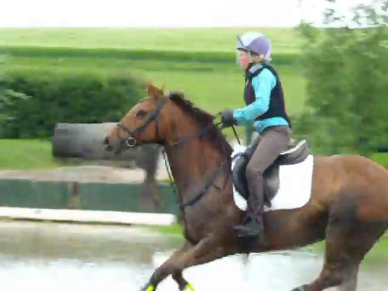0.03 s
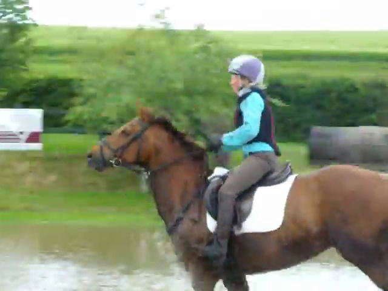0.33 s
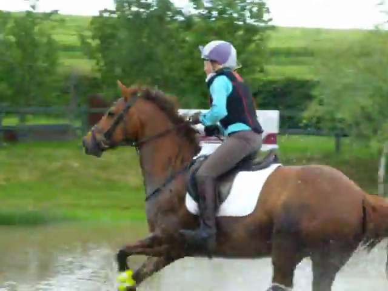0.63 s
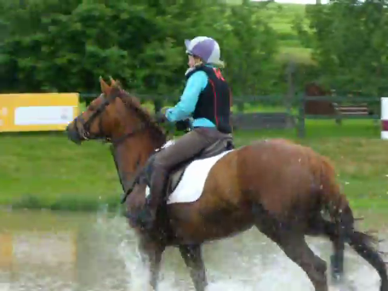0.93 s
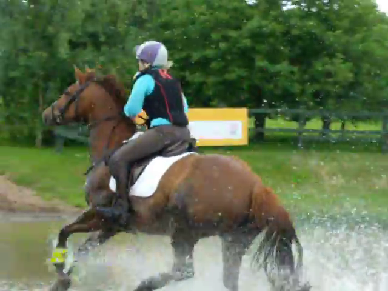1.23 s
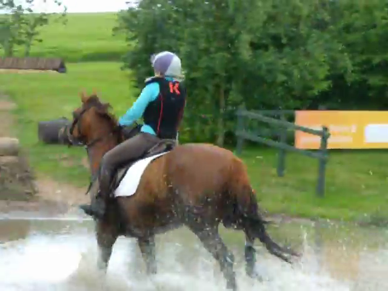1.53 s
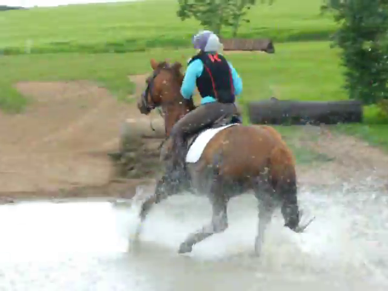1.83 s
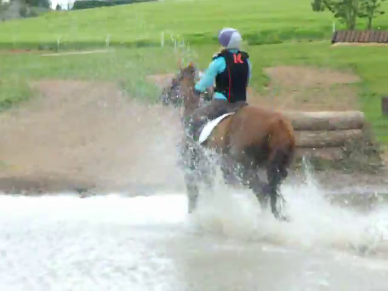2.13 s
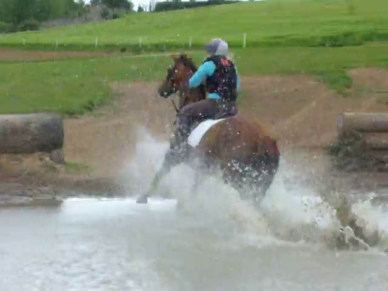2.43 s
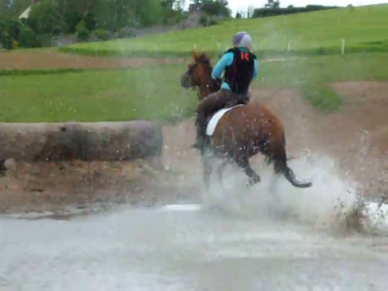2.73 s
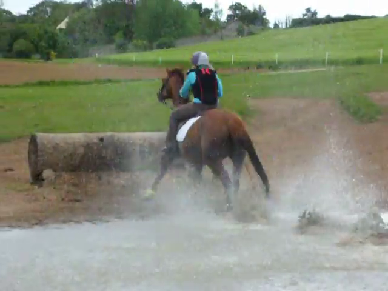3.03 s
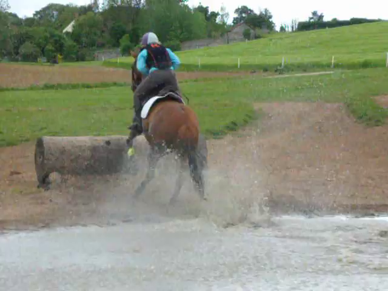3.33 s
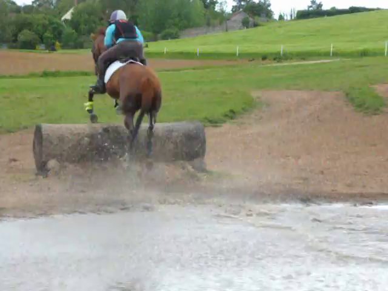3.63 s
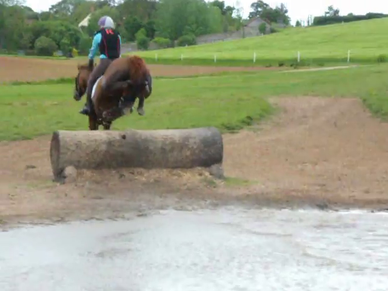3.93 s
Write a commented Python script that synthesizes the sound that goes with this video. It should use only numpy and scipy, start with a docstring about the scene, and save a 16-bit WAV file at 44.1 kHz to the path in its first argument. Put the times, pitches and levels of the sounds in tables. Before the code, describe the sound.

Water splashes from the start as a horse canters through a shallow pond, a hissing, bubbling spray with a few close slaps and sharp drops in the first 2.5 seconds. The spray is fullest around 1.5 to 2 seconds and fades away from 3 to 4 seconds. Wind buffets the microphone throughout with a low, uneven rumble, gusting hardest at the very start and around 3 seconds.

```python
"""Horse through a pond in wind.

A horse canters away through shallow water and up a bank, heard as spray that swells and fades.
Its legs throw up water that falls back as hiss, fizz, bubbles, close slaps and a few sharp drops.
Gusts buffet the microphone and overload a small recorder with a narrow treble."""
import sys
import numpy as np
from scipy import signal
from scipy.fft import rfft, irfft
from scipy.io import wavfile
from scipy.ndimage import uniform_filter1d

SR = 44100
rng = np.random.default_rng(int(sys.argv[2]) if len(sys.argv) > 2 else 0)


def waveform_to_disk(signal):
    """Save audio, clipped to [-1, 1], as 16-bit WAV at the path in sys.argv[1]."""
    frames = np.transpose(np.atleast_2d(signal))
    scaled = np.clip(frames, -1, 1) * 32767
    samples = np.round(scaled).astype(np.int16)
    wavfile.write(sys.argv[1], SR, samples)


N = 176400
T = np.arange(N) / SR

# gust strength: time_s, level_db
GUST_LEVEL = [(0.0, -5.5), (0.05, -13.5), (0.105, 1), (0.14, -9), (0.16, -8), (0.25, -20), (0.29, -22),
              (0.31, -17.5), (0.335, -9), (0.37, -4.5), (0.385, -19), (0.45, -7.5), (0.475, -24),
              (0.555, -10), (0.595, -22), (0.66, -7.5), (0.7, -9.5), (0.755, -6.5), (0.795, -17.5),
              (0.835, -6.5), (0.89, -6.0), (0.91, -21.5), (0.97, -6.5), (1.04, -13), (1.075, -9),
              (1.12, -11.5), (1.23, -9), (1.25, -14.5), (1.27, -6), (1.295, -25), (1.36, -13),
              (1.415, -16.5), (1.44, -6.5), (1.53, -10.5), (1.58, -12.5), (1.635, -9.5), (1.675, -20),
              (1.715, -11), (1.745, -27), (1.8, -15.5), (1.86, -26.5), (1.89, -16.5), (1.97, -21),
              (1.98, -13.5), (2.09, -14.5), (2.11, -25), (2.19, -13.5), (2.22, -19), (2.29, -10.5),
              (2.4, -20), (2.415, -14.0), (2.475, -13), (2.51, -22.5), (2.55, -12.5), (2.64, -15),
              (2.695, -8.5), (2.715, -11.5), (2.765, -12), (2.795, -16), (2.88, -5), (2.895, -11),
              (2.995, 1.5), (3.01, -1), (3.055, -13), (3.08, 2.5), (3.125, -7), (3.23, -5), (3.255, 1.5),
              (3.27, -8), (3.375, -10.0), (3.45, -10), (3.47, -15), (3.5, -9.5), (3.59, -14), (3.605, -21),
              (3.63, -7), (3.665, -8), (3.69, -2), (3.75, -8), (3.775, -6), (3.84, -8.5), (3.88, -7.5),
              (3.955, -20), (4.0, -9.5)]
# gust roughness, as gain of the upper wind bands: time_s, gain_db
FLUTTER_GAIN = [(0, -3.5), (.4, 1), (.65, -6), (.75, 5.5), (.85, -1.5), (1.3, -0.5), (1.7, 0), (2.2, -5.5),
                (2.7, -3.5), (2.95, -1.5), (3.25, 7), (3.5, 6), (3.7, -3.5), (4, -9)]
# wind spectrum: freq_hz, density_db
WIND_SPECTRUM = [(50, -6.5), (95, 0), (180, -2), (350, -7.5), (700, -17), (1200, -25.5), (2000, -40.5),
                 (4000, -56)]
# band swing with gust strength: freq_hz, db_per_db
GUST_SWING = [(80, 1.13), (200, 1.0), (500, 0.95), (1500, 0.88)]
# hard buffets within gusts: start_s, flutter_jump_db, length_s
BUFFET_HITS = [(.0, 18.5, 0.011), (0.122, 13.5, 0.015), (0.152, 11, 0.01), (0.288, 18.5, 0.0093),
               (0.392, 10, 0.0088), (0.441, 8.5, 0.031), (0.727, 8, 0.008), (.742, 10, .025),
               (0.856, 1, 0.011), (0.999, 10.5, 0.039), (1.286, -1, 0.0062), (1.356, 15.5, 0.013),
               (1.394, 16.5, 0.013), (1.487, 14, 0.01), (1.732, 3, 0.008), (1.977, 7.5, 0.012),
               (2.279, 5, 0.031), (2.409, 7.5, .018), (2.766, 14.5, 0.02), (2.836, -4, .008),
               (2.854, 13, .012), (2.908, 11, 0.035), (2.963, 11.5, 0.015), (3.068, 15, 0.011),
               (3.187, 10, 0.024), (3.232, 8.5, 0.019), (3.4, 11, 0.013), (3.444, 10.5, 0.012),
               (3.543, 7, 0.031), (3.626, 5.5, 0.0094), (3.754, 15.5, 0.027), (3.792, 12, 0.012),
               (3.848, 16, 0.007)]
# deep pressure swings: time_s, level_db
RUMBLE_LEVEL = [(0, -21), (.15, -13), (.25, -17.5), (.35, -14), (.55, -17), (.71, -13.5), (.83, -18),
                (1.2, -17.5), (1.34, -18), (1.45, -13), (1.75, -27), (2.05, -16.5), (2.15, -25), (2.3, -20),
                (2.5, -17.5), (3.05, -18.5), (3.4, -21), (3.75, -12.5), (4, -20)]
# water thrown up and falling back: time_s, level_db
SPRAY_ENVELOPE = [(0, -28.5), (.04, -21), (.1, -24), (.18, -27.5), (.22, -22), (.3, -27), (.34, -20.5),
                  (.43, -22.5), (.55, -18.5), (.62, -23), (.75, -19.5), (.9, -20.5), (1.0, -20), (1.2, -21),
                  (1.4, -19), (1.55, -19), (1.75, -18), (1.87, -20), (2.0, -19), (2.14, -19.5), (2.24, -22),
                  (2.4, -21), (2.52, -21), (2.62, -21.5), (2.72, -21.5), (3.0, -23), (3.24, -25.5),
                  (3.5, -29.5), (3.75, -33.5), (4, -39)]
# spray spectrum: freq_hz, density_db
SPRAY_SPECTRUM = [(200, 17), (500, -9.5), (900, 4.5), (1300, 3), (1900, -2.5), (2800, 4.5), (3500, -2),
                  (4200, 2.5), (4700, 2), (5250, 2), (5800, -25), (7000, -18)]
# close slaps of water: start_s, level_db, band_hz, length_s
WATER_SLAPS = [(0.148, -8, 2980, 0.0087), (0.257, -5.5, 3900, 0.0083), (0.473, -16, 4530, 0.0034),
               (0.725, -7, 3200, .006), (1.076, -18, 4300, 0.0044), (1.313, -7.5, 3600, 0.0066),
               (1.327, -8.5, 2650, 0.0042), (1.714, -13.5, 4180, 0.021), (1.8, -13, 4000, 0.0055),
               (1.92, -4.5, 2300, 0.0036), (2.135, -16.5, 4600, 0.02)]
# ringing drops: start_s, level_db, pitch_hz, t60_s
WATER_DROPS = [(1.819, 6.5, 4530, 0.0044), (2.102, -13.5, 3030, 0.045), (2.4862, -9, 2170, .03),
               (2.5326, 1, 4800, 0.0073)]
# recorder treble response: freq_hz, gain_db
TREBLE_RESPONSE = [(5600, 0), (6500, -6.5), (8000, -5), (10500, -2), (15000, -5)]


def from_db(db):
    """Decibels to gain."""
    return 10 ** (np.asarray(db) / 20)


def unit_rms(x):
    """Scale to rms 1."""
    return x / np.sqrt(np.mean(x ** 2) + 1e-20)


def running_rms(x, samples):
    """Sliding-window rms."""
    return np.sqrt(uniform_filter1d(x ** 2, size=samples) + 1e-12)


def in_time(table):
    """Read a table at every sample."""
    return np.interp(T, *np.transpose(table))


def at_hz(table, hz):
    """Read a table on a log-frequency axis."""
    freq_hz, values = np.transpose(table)
    return np.interp(np.log(hz), np.log(freq_hz), values)


def add(out, start_s, sound):
    """Mix in a short sound."""
    i = max(int(start_s * SR), 0)
    out[i:i + len(sound)] += sound[:N - i]


def drift(rate_hz):
    """Slow random curve, rms about 1."""
    hop, settle = 40, 2000
    pole = np.exp(-2 * np.pi * rate_hz * hop / SR)
    white = rng.standard_normal(N // hop + settle + 2)
    slow = signal.lfilter([1], [1, -2 * pole, pole * pole], white)[settle:]
    return np.interp(np.arange(N) / hop, np.arange(len(slow)), unit_rms(slow))


def band(x, low_hz, high_hz):
    """Band-pass."""
    return signal.sosfilt(signal.butter(2, [low_hz, high_hz], "band", fs=SR, output="sos"), x)


def noise_bands(low_hz, high_hz, spectrum, count):
    """(centre_hz, noise) pairs that sum to the spectrum at rms about 1."""
    edges_hz = np.geomspace(low_hz, high_hz, count + 1)
    centres_hz = np.sqrt(edges_hz[1:] * edges_hz[:-1])
    gains = from_db(at_hz(spectrum, centres_hz)) * np.sqrt(np.diff(edges_hz))
    gains /= np.linalg.norm(gains)
    noises = [band(rng.standard_normal(N + SR // 2), low, high)[-N:]
              for low, high in zip(edges_hz, edges_hz[1:])]
    return [(hz, gain * unit_rms(x)) for hz, gain, x in zip(centres_hz, gains, noises)]


def ring(clicks, hz, t60_s):
    """Resonator: each click starts a decaying sine."""
    pole = from_db(-60 / (t60_s * SR))
    step_rad = 2 * np.pi * hz / SR
    feedback = [1, -2 * pole * np.cos(step_rad), pole * pole]
    return signal.lfilter([0, np.sin(step_rad)], feedback, clicks + 1e-18)


def wind():
    """Turbulence at the microphone port: swings with the gusts, flutters with quick eddies."""
    reference_db, trim_db = -12, -0.1
    swing_db = in_time(GUST_LEVEL) - reference_db
    flutter_db = in_time(FLUTTER_GAIN) + buffets_db() + 2.94 * drift(rate_hz=120)
    bands = noise_bands(50, 4500, WIND_SPECTRUM, count=11)
    out = np.zeros(N)
    for hz, noise in bands:
        flutter_share = np.clip(np.log2(hz / 150) / 2, 0, 1)  # none below 150 Hz, full from 600 Hz
        out += noise * from_db(at_hz(GUST_SWING, hz) * swing_db + flutter_share * flutter_db)
    noise_rms = running_rms(sum(noise for _, noise in bands), samples=1100)
    return from_db(reference_db + trim_db) * out / noise_rms


def buffets_db():
    """Extra flutter: each buffet strikes fast, holds briefly and lets go."""
    attack_s = 0.003
    out, age_s = np.zeros(N), T[:SR // 10]
    for start_s, jump_db, length_s in BUFFET_HITS:
        attack = np.minimum(age_s / attack_s, 1)
        release = np.clip(2 - 1.56 * age_s / length_s, 0, 1)
        add(out, start_s, jump_db * attack * release)
    return out


def rumble():
    """The largest eddies push slowly on the diaphragm."""
    noise = band(rng.standard_normal(N + SR), low_hz=28.2, high_hz=65.6)[SR:]
    return from_db(in_time(RUMBLE_LEVEL) - 2.5) * noise / running_rms(noise, samples=6000)


def bubble_cloud(per_s, t60_cycles, spread_db, low_hz, high_hz, clump_db, pitches):
    """Bubbles form in random clumps, each ringing at one of a set of pitches; rms 1."""
    sizes = from_db(spread_db * np.minimum(rng.exponential(1, N), 4)) * rng.choice([-1, 1], N)
    born = rng.random(N) < per_s / SR * from_db(clump_db * drift(rate_hz=14))
    pitch_index = rng.integers(0, pitches, N)
    out = np.zeros(N)
    for k, hz in enumerate(np.geomspace(low_hz, high_hz, pitches)):
        clicks = sizes * born * (pitch_index == k)
        out += from_db(at_hz(SPRAY_SPECTRUM, hz)) * hz * ring(clicks, hz, t60_cycles / hz)
    return unit_rms(out)


def spray():
    """Falling water: patchy hiss, fine fizz and larger bubbles, all following the amount thrown."""
    shared_db = 0.7 * drift(rate_hz=25)
    bands = noise_bands(400, 6400, SPRAY_SPECTRUM, count=18)
    hiss = sum(noise * from_db(shared_db + 1.5 * drift(rate_hz=40)) for _, noise in bands)
    fizz = bubble_cloud(per_s=3000, t60_cycles=8.3, spread_db=3.5,
                        low_hz=1120, high_hz=5200, clump_db=2, pitches=18)
    bubbles = bubble_cloud(per_s=430, t60_cycles=120, spread_db=4.5,
                           low_hz=607, high_hz=3600, clump_db=7.5, pitches=30)
    water = from_db(-4) * hiss + from_db(-5.5) * fizz + from_db(-14.5) * bubbles
    return from_db(in_time(SPRAY_ENVELOPE)) * water


def slaps():
    """Lumps of water land close by, each a short wideband burst."""
    out = np.zeros(N)
    for start_s, level_db, band_hz, length_s in WATER_SLAPS:
        progress = T[:SR // 10] / length_s
        white = rng.standard_normal(len(progress))
        splash = band(white, band_hz / 1.84, band_hz * 1.17)
        body = band(white, low_hz=494, high_hz=5500)
        envelope = (1 - np.exp(-5 * progress)) * np.exp(-np.minimum(progress, 10) ** 2)
        add(out, start_s, from_db(level_db) * unit_rms(splash + body) * envelope)
    return out


def drops():
    """Each drop ticks on the surface and traps a bubble whose note rises as it dies."""
    rise_per_s, attack_s, tick_decay_s = 12, 0.00023, 0.0007
    out, age_s = np.zeros(N), T[:SR // 10]
    attack = 1 - np.exp(-age_s / attack_s)
    for start_s, level_db, pitch_hz, t60_s in WATER_DROPS:
        phase_rad = 2 * np.pi * pitch_hz * age_s * (1 + rise_per_s * age_s / 2)
        note = np.sin(phase_rad) * from_db(-60 * age_s / t60_s)
        tick = 0.98 * rng.standard_normal(len(age_s)) * np.exp(-age_s / tick_decay_s)
        add(out, start_s, from_db(level_db) * (note + tick) * attack)
    return out


def scene():
    """Wind on the microphone plus water, mono."""
    return (wind() + rumble() + spray() + slaps() + drops())[None]


def record(dry):
    """Small recorder: steep treble limit, hard clipping, dulled crackle, final low-pass."""
    stopband_hz, clip_level, cutoff_hz = 6450, 0.73, 15900
    narrow = signal.sosfilt(signal.cheby2(16, 60, stopband_hz, fs=SR, output="sos"), dry)
    clipped = np.clip(narrow, -clip_level, clip_level)
    treble_gain = from_db(at_hz(TREBLE_RESPONSE, np.fft.rfftfreq(N, 1 / SR) + 1))
    dulled = irfft(rfft(clipped) * treble_gain, N)
    return signal.sosfilt(signal.ellip(10, 0.1, 80, cutoff_hz, fs=SR, output="sos"), dulled)


dry = scene()
out = record(dry)
waveform_to_disk(out)
```